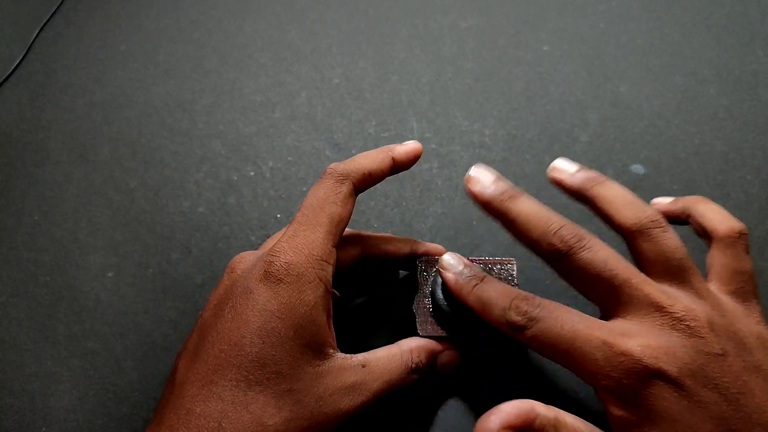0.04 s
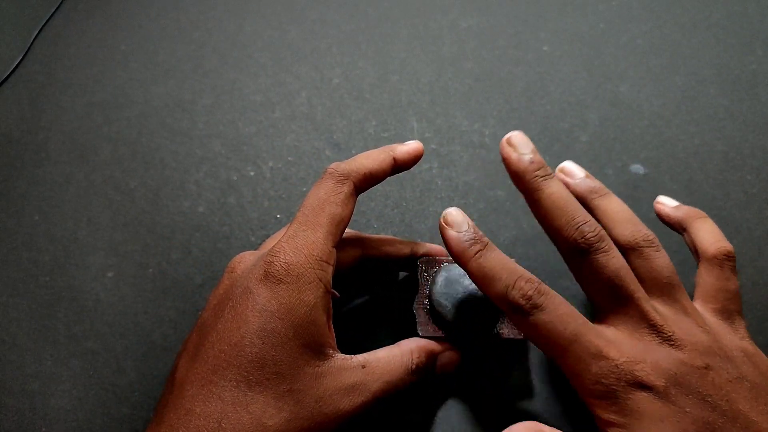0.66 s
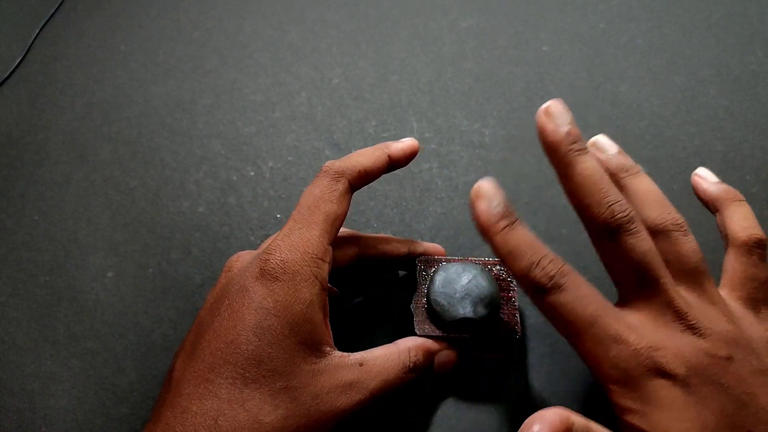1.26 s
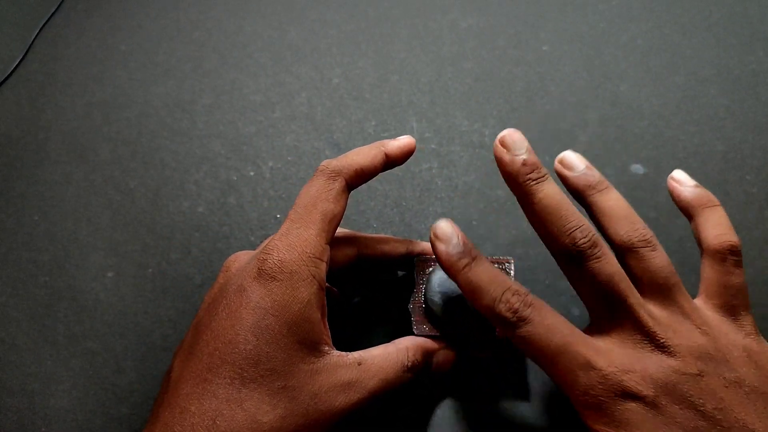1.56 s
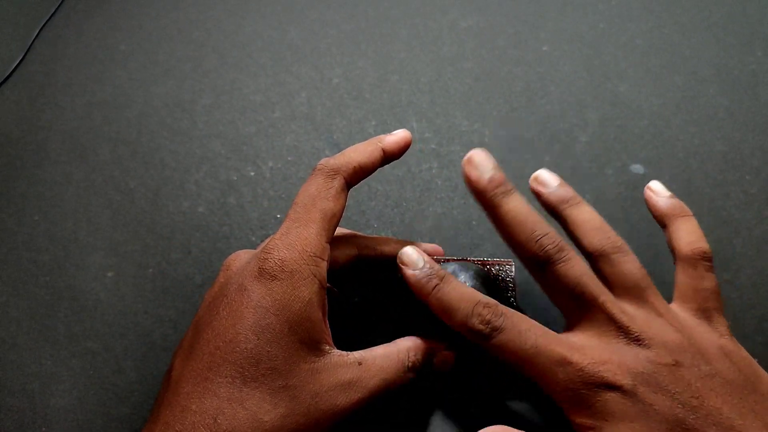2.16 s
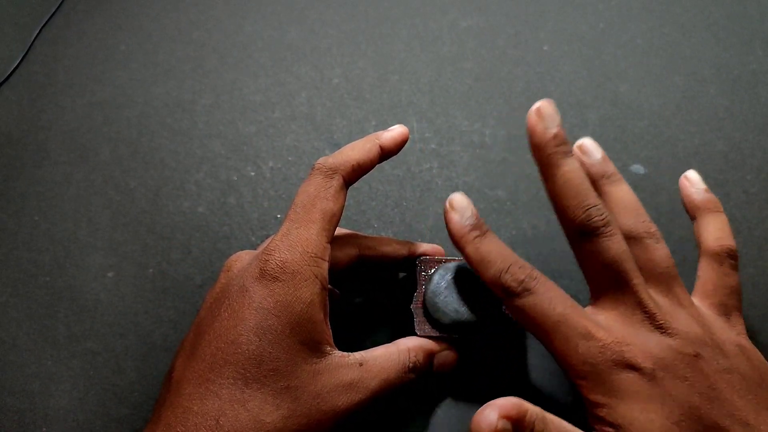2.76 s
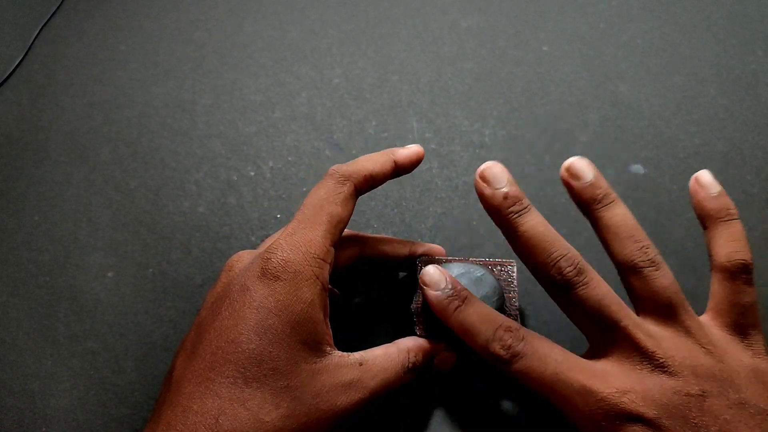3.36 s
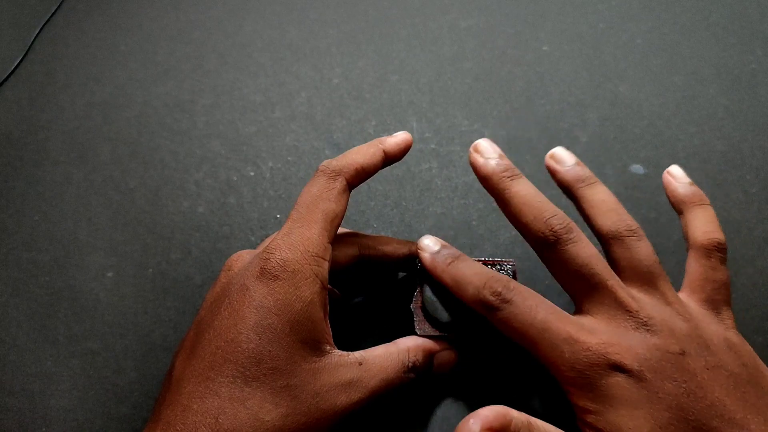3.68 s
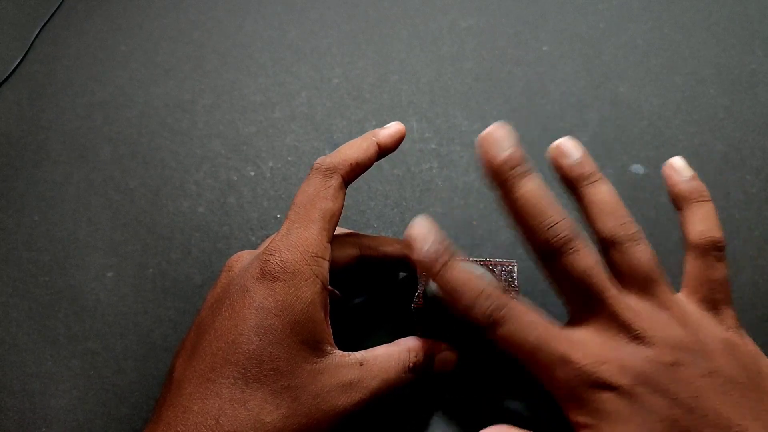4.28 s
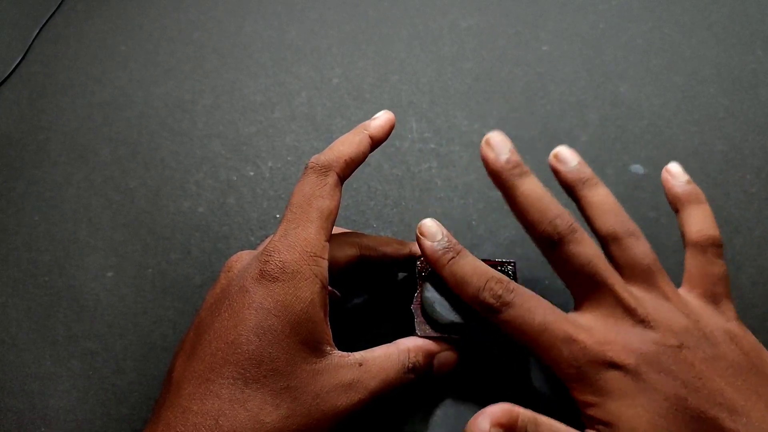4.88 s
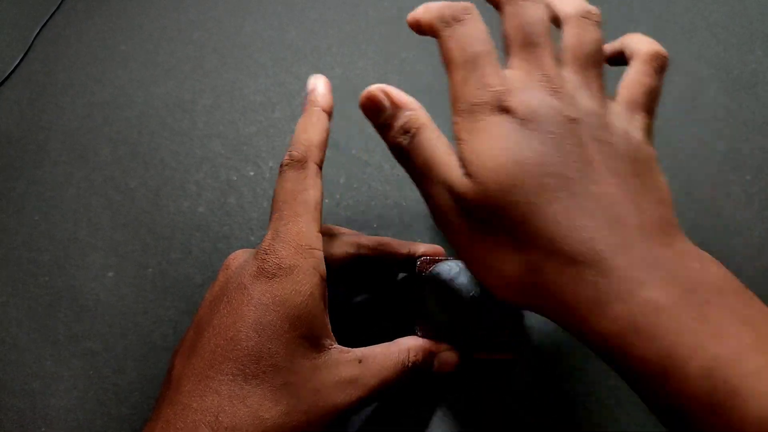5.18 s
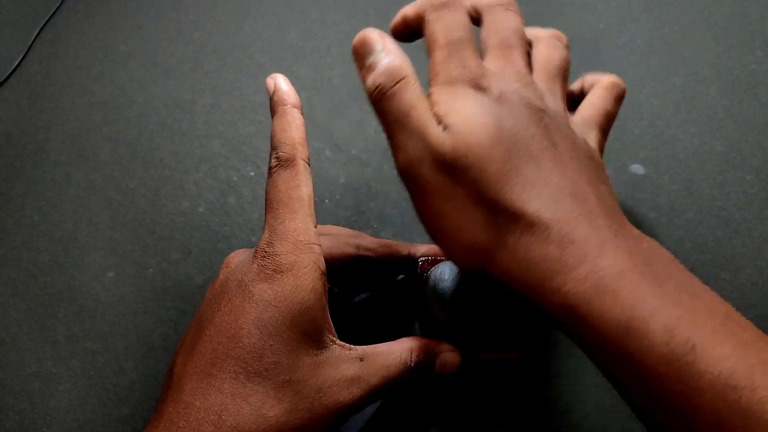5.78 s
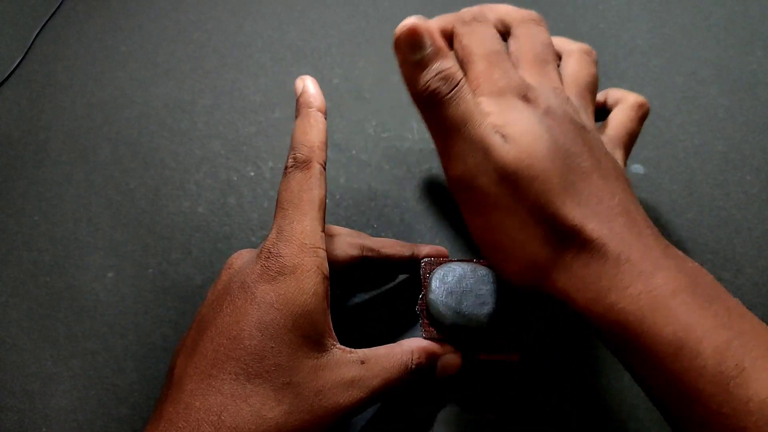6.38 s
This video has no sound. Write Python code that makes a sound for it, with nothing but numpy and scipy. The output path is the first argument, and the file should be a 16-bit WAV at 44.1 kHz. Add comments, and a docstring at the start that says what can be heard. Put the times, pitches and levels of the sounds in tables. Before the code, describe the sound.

Close up in a small, quiet room, quick fingertip taps land on putty, thudding softly through a table while the plastic base underneath clicks and chatters. The taps start light, vary in strength and are hardest just before they end. The hand then leans on the putty, and a few light knocks and tiny tacky clicks sound over a brief low rumble and a faint hiss of sliding skin.

```python
"""A finger taps a lump of putty on a small plastic base about six times a second, close to the microphone.
Each tap thumps the tabletop and rocks the base: the harder the tap, the later and more often it rebounds.
Light touches fall in between, and the tacky putty ticks as skin peels off it.
At the end the hand leans over and presses with the thumb, swaying the table and rubbing a little.
A small, quiet room rings briefly around it all."""
import sys
import numpy as np
from scipy import signal
from scipy.fft import rfft, irfft
from scipy.io import wavfile

SR = 44100
rng = np.random.default_rng(int(sys.argv[2]) if len(sys.argv) > 2 else 0)


def transcribe(u):
    """Save the signal u as a 16-bit wav file named by the first command-line argument.

    u: samples, shape (n,) or (channels, n), limited to [-1, 1]; the rate is SR.
    q: integer samples, one column per channel.
    """
    v = np.clip(np.atleast_2d(u).T, -1, 1)
    q = np.round(v * 32767).astype(np.int16)
    wavfile.write(sys.argv[1], SR, q)


N = 292515

# Taps on the putty. Each row: start in seconds, force in dB relative to full force, relative snap in dB.
TAPS = [(0.0748, -28, -76), (0.2534, -16, -63.5), (0.4336, -15, -66), (0.65, -10, -60),
        (0.8228, -13.5, -60.5), (0.9853, -19.5, -65), (1.1553, -18, -63.5), (1.4276, -12.5, -46),
        (1.5973, -3, -52), (1.7523, -9, -55), (1.909, -19, -67), (2.0712, -8, -61), (2.2399, -6.5, -59),
        (2.3974, -8.5, -62), (2.5563, -8.5, -61), (2.7241, -10.5, -59), (2.9014, -9.5, -55),
        (3.0701, -8, -49), (3.272, -3.5, -43.5), (3.4615, -3.5, -55), (3.6407, -12, -65),
        (3.7797, -14.5, -60), (3.9477, -9, -61), (4.2356, -1.7, -56.5), (4.4254, -0.7, -55.5),
        (4.6171, -0.3, -56), (4.7987, -2, -56), (4.9567, -4.5, -57)]
# The ring of the tabletop. Each row: pitch in Hz, relative level in dB, t60 in seconds.
TABLETOP_MODES = [(35, -15, .4), (45.2, -14.5, 0.16), (63.03, -3.7, 0.29), (106.5, -5, 0.19),
                  (143, -22, 0.14), (197.2, -8, 0.14), (261.3, 1.5, 0.052), (294, 1, 0.058),
                  (395, -11, 0.018), (480.4, -24, 0.074), (621, -24, .14), (705, -21.5, 0.11)]
# The tone of a dead kick on the tabletop. Each row: frequency in Hz, relative level in dB.
KICK_SPECTRUM = [(40, -12), (105, 5.5), (175, 4.5), (290, 4), (470, -9), (690, -9), (900, -18), (1400, -28),
                 (3000, -36), (8000, -72)]
# The tone of rubbing skin. Each row: frequency in Hz, relative level in dB.
SKIN_SPECTRUM = [(400, 11), (1100, -6.5), (3000, -1.5), (6000, -6.5), (11000, -7.5), (14400, -20)]


def from_db(db):
    """Decibels to gain."""
    return 10 ** (np.asarray(db) / 20)


def rms_one(x):
    """Scale to unit rms."""
    return x / np.sqrt(np.mean(x ** 2) + 1e-20)


def at_hz(points, hz):
    """Read a table on a log-frequency axis."""
    f, value = np.transpose(points)
    return np.interp(np.log(np.maximum(hz, 1)), np.log(f), value)


def clicks(times, db):
    """One impulse for each contact."""
    out = np.zeros(N)
    np.add.at(out, np.clip(np.round(times * SR).astype(int), 0, N - 1), from_db(db))
    return out


def soften(x, hz, order):
    """Low-pass: a soft contact passes little treble."""
    return signal.sosfilt(signal.butter(order, hz, fs=SR, output="sos"), x + 1e-18)


def colour(x, spectrum):
    """Causal (minimum-phase) filter with this spectrum and unit power gain."""
    size = 2 ** 14
    gain = rms_one(from_db(at_hz(spectrum, np.arange(size // 2 + 1) * SR / size)))
    cepstrum = irfft(np.log(gain))[:size // 2]
    cepstrum[1:] *= 2
    response = irfft(np.exp(rfft(cepstrum, size)))
    return signal.fftconvolve(x, response)[:N]


def bursts(hits, t60):
    """Each impulse sets off a puff of noise that dies away."""
    decay = from_db(-120 / (t60 * SR))
    power = signal.lfilter([1], [1, -decay], hits ** 2 + 1e-24)
    return np.sqrt(power) * rng.standard_normal(N)


def strike(modes, times, db, spread_db):
    """Every blow rings each mode with its own strength; neighbouring modes swing in opposite senses."""
    out = np.zeros(N)
    for k, (hz, level_db, t60) in enumerate(modes):
        r, w = from_db(-60 / (t60 * SR)), 2 * np.pi * hz / SR
        force = clicks(times, db + level_db + spread_db * rng.standard_normal(len(times)))
        out += (-1) ** k * signal.lfilter([0, np.sin(w)], [1, -2 * r * np.cos(w), r * r], force + 1e-18)
    return out


def stutter(times, db, span_s, spread_db, count):
    """Break each contact into a quick run of uneven little impacts that share its energy."""
    late = span_s * (np.arange(count) + rng.random((len(times), count))) / count
    share = from_db(spread_db * rng.standard_normal((len(times), count)) - 8 * late / span_s)
    share /= np.sqrt(np.sum(share ** 2, axis=1, keepdims=True))
    return (times[:, None] + late).ravel(), (db[:, None] + 20 * np.log10(share)).ravel()


def swells(rows, skew):
    """Gain of strokes that each rise and fall in a half sine; a skew below 1 makes them peak early."""
    t = np.arange(N) / SR
    return sum(from_db(db) * np.sin(np.pi * np.clip((t - start) / length, 0, 1) ** skew)
               for start, length, db in rows)


def room_tone():
    """A steady bed of quiet room rumble and microphone hiss."""
    # Each row: frequency in Hz, relative level in dB.
    bed_spectrum = [(12, -35.5), (20, 3), (130, -7), (437, -27), (778, -27), (1180, -32), (1310, -30),
                    (1640, -32), (3350, -35.5), (5650, -43), (14400, -43.5)]
    return from_db(-68) * rms_one(colour(rng.standard_normal(N), bed_spectrum))


def table_sway():
    """Shifting weight sways the table: a faint rumble under the tapping, swelling as the hand leans."""
    # Each row: frequency in Hz, relative level in dB.
    sway_spectrum = [(10, -13.5), (20, -4.5), (30, 2.5), (45, -12), (85, -20), (160, -46), (400, -79),
                     (2000, -110)]
    # The hand leans in. Each row: start in seconds, length in seconds, peak level in dB.
    leans = [(5.41, .28, -50.5), (5.74, .24, -40), (6.04, .24, -44), (6.33, .2, -51)]
    tapping = np.arange(N) / SR < 5.1
    rumble = rms_one(colour(rng.standard_normal(N), sway_spectrum))
    bed_gain = soften(from_db(np.where(tapping, -57, -69)), hz=20, order=1)
    return rumble * (bed_gain + swells(leans, skew=.55))


def thumps():
    """The putty cushions the finger, so only the lowest table modes answer its weight."""
    times, force_db, _ = np.transpose(TAPS)
    thump_db = -31.8 + .19 * force_db   # cushioned: it grows little with force
    return soften(strike(TABLETOP_MODES, times + .00034, thump_db, spread_db=.75), hz=134.8, order=3)


def knocks(touches):
    """The finger knocks on the table: full taps with its soft pad, light touches with its tip."""
    press_s = .0066   # the putty squashes this long before the push reaches the table
    tap_times, force_db, _ = np.transpose(TAPS)
    pad_db = -34 + .53 * force_db
    pad_ring = strike(TABLETOP_MODES, tap_times, pad_db, spread_db=2.2)
    pad_kick = colour(clicks(tap_times + press_s, pad_db + 19), KICK_SPECTRUM)
    pad = soften(pad_ring + pad_kick, hz=335, order=2)
    touch_times, tip_db, _ = touches.T
    tip_ring = strike(TABLETOP_MODES, touch_times + .0019, tip_db + 1, spread_db=3)
    tip_ring = soften(tip_ring, hz=385, order=2)
    tip_ring -= soften(tip_ring, hz=150, order=1)   # a shorter contact stirs less bass
    tip_kick = colour(clicks(touch_times + .00307, tip_db + 13), KICK_SPECTRUM)
    return pad + tip_ring + tip_kick


def snaps(touches):
    """Skin snaps against the putty: a short ring and a puff of hiss on every tap and touch."""
    # Fingertip, putty and base together. Each row: pitch in Hz, relative level in dB, t60 in seconds.
    snap_modes = [(404, -8.5, 0.025), (605, -11, 0.013), (685, -7, 0.029), (1021.5, 0, 0.016),
                  (1233, -2, 0.01), (1735, -13, 0.016)]
    times, _, snap_db = np.vstack([TAPS, touches]).T
    ring = strike(snap_modes, times + .0012, snap_db + 1, spread_db=2)
    skin = colour(bursts(clicks(times, snap_db - 15), t60=.051), SKIN_SPECTRUM)
    return ring + skin


def base_contacts():
    """The rocking base meets the table. Each row: time in seconds, chatter in dB, kick offset in dB."""
    # The base tips, drops an edge, falls flat and rebounds twice; a harder tap throws it higher.
    # Each row: delay at full force in seconds, added seconds per dB of force, chatter at full force in dB,
    # added dB per dB of force, least force needed in dB, kick offset from the chatter in dB.
    rocking = [(0.0071, -.00007, -50, .23, -26, -8), (0.0132, 0, -49.5, .75, -22, -12),
               (0.016, .0001, -44, .85, -22, 5), (0.0186, 0, -53, .15, -25, -14),
               (0.032, .00055, -44.5, .4, -13.5, 5.5), (0.0352, .00065, -50, .6, -12, -9),
               (0.0462, .0007, -48.5, .1, -8, 5), (0.0503, .0006, -51.5, .2, -7, -2)]
    # Lone ticks as the base settles. Each row: start in seconds, relative chatter in dB.
    settling_ticks = [(1.0246, -58), (3.339, -59), (3.679, -57)]
    light_kick_db, uneven_s, uneven_db = -16, .0004, 1.0
    rows = [(start, db, light_kick_db) for start, db in settling_ticks]
    for start, force_db, _ in TAPS:
        rows.append((start, -67 + .7 * force_db, light_kick_db))   # a graze as the finger lands
        for delay, delay_per_db, full_db, per_db, least_db, kick_db in rocking:
            late, louder = rng.standard_normal(2)
            spare_force = max(1 - from_db(least_db - force_db), 1e-4)   # only the excess lifts the base
            landing = start + delay + delay_per_db * force_db + uneven_s * late
            chatter_db = full_db + per_db * force_db + 10 * np.log10(spare_force) + uneven_db * louder
            rows.append((landing, chatter_db, kick_db))
    return np.array(rows)


def base_chatter():
    """Each contact of the base spits gritty clicks, rings the plastic and gives the table a dead kick."""
    # Each row: pitch in Hz, relative level in dB, t60 in seconds.
    plastic_modes = [(1450, -23, 0.0022), (2107, 2, 0.008), (2350, -1.3, 0.012), (2762, -8.5, 0.012),
                     (5275, -32, 0.052), (10400, -56, 0.003), (12100, -32, 0.012)]
    # Each row: frequency in Hz, relative level in dB.
    grit_spectrum = [(500, 20.5), (1000, 10.5), (2300, -7.5), (3600, 1.5), (5500, 5.5), (8000, 8.5),
                     (10200, 11.5), (14400, 11.5)]
    times, db, kick_db = base_contacts().T
    firm_db = .34 * (db + 53.5)   # firm contacts ring the plastic; grazing ones are mostly grit
    plastic = strike(plastic_modes, times + .00021, db + firm_db - .3, spread_db=2.8)
    grit_db = db - firm_db
    # An edge never lands flat, so each click is a tiny flam.
    flam_times, flam_db = stutter(times - .0003, grit_db, span_s=.0013, spread_db=4, count=2)
    sharp = clicks(flam_times, flam_db + 13.3) * rng.choice([-1, 1], N)
    hits = clicks(times, grit_db)
    fizz = from_db(-15) * bursts(hits, t60=.013) + from_db(-14) * bursts(hits, t60=.049)
    grit = colour(sharp + fizz, grit_spectrum)
    kick = colour(clicks(times + .0005, db + kick_db + 26.5), KICK_SPECTRUM)
    return plastic + grit - kick


def room_tail(x):
    """Diffuse tail of a small room, dying at its own pace in each octave."""
    # Each row: frequency in Hz, relative level in dB.
    tail_spectrum = [(150, -2), (300, 0), (480, -2.5), (680, 3.5), (1050, -1), (1600, -13), (2500, -0.5),
                     (5000, -8.5), (14000, -24)]
    # Each row: frequency in Hz, t60 in seconds.
    decay_times = [(150, 0.45), (700, 0.35), (2500, 0.26), (14000, 0.46)]
    t = np.arange(int(.6 * SR)) / SR
    tail = np.zeros(len(t))
    for low_hz in 110 * 2. ** np.arange(7):
        octave = signal.butter(2, [low_hz, 2 * low_hz], "band", fs=SR, output="sos")
        band = signal.sosfilt(octave, rng.standard_normal(len(t)))
        hz = low_hz * np.sqrt(2)
        tail += band * from_db(at_hz(tail_spectrum, hz) - 60 * t / at_hz(decay_times, hz))
    tail *= 1 - np.exp(-t / .002)
    return signal.fftconvolve(x, tail / np.sqrt(np.sum(tail ** 2)))[:N]


def putty_peel():
    """Skin peeling off the tacky putty makes a few tiny bright clicks."""
    # The putty lets go. Each row: start in seconds, relative level in dB.
    releases = [(0.147, -73), (1.3438, -61.5), (1.373, -71.5), (5.883, -66), (6.171, -66), (6.383, -75),
                (6.41, -74)]
    # Each row: frequency in Hz, relative level in dB.
    peel_spectrum = [(500, -6), (1800, 12), (3200, -16), (4400, 4), (6300, 2.5), (8000, 4), (11000, -3),
                     (14400, 5)]
    times, db = stutter(*np.transpose(releases), span_s=.0025, spread_db=2.5, count=5)
    return colour(clicks(times, db + 21.5) * rng.choice([-1, 1], N), peel_spectrum)


def light_touches():
    """Touches that leave the base at rest, plus the faint bump of the finger lifting after each tap."""
    # Each row: start in seconds, relative knock in dB, relative snap in dB.
    touches = [(0.333, -54, -85), (1.691, -42.5, -51.5), (1.978, -56, -73), (2.146, -54, -76),
               (2.322, -48.5, -65), (2.654, -52, -82), (2.834, -50, -76), (3.162, -41, -53),
               (3.874, -50, -64), (4.029, -49, -74), (4.693, -52, -64), (5.06, -44.5, -58.5),
               (5.582, -42, -47.5), (5.884, -40.5, -46.5), (6.17, -52, -64), (6.41, -62, -75)]
    lift_s, scatter_s = .08, .006
    lifts = [(start + lift_s + scatter_s * rng.standard_normal(), -64, -80) for start, _, _ in TAPS]
    return np.array(touches + lifts)


def skin_rub():
    """Sliding skin hisses in fine grains."""
    # Each row: start in seconds, length in seconds, relative peak level in dB.
    slides = [(.29, .17, -75.5), (1.65, .5, -80), (2.1, .6, -81.5), (2.62, .72, -78.5), (3.45, .5, -82.5),
              (4.75, .55, -85), (5.36, .4, -78), (5.68, .24, -77.5), (6.07, .14, -76), (6.36, .08, -80)]
    grain_db = 3 * rms_one(soften(rng.standard_normal(N), hz=126, order=2))
    hiss = colour(rng.standard_normal(N) * from_db(grain_db), SKIN_SPECTRUM)
    return hiss * swells(slides, skew=.9)


def scene():
    """Table, base and hand over a quiet room, in mono."""
    touches = light_touches()
    knock = knocks(touches)
    snap = snaps(touches)
    rattle = base_chatter() + putty_peel()
    # Knocks reach the microphone through the table, snaps through the air, so snaps carry more room.
    tail = room_tail(from_db(-21.5) * knock + from_db(-25) * rattle + from_db(-3.5) * snap)
    return (room_tone() + thumps() + knock + snap + rattle + table_sway() + skin_rub() + tail)[None]


def record(dry):
    """A steep low-pass takes off the very top."""
    cutoff_hz = 14450
    return signal.sosfilt(signal.ellip(12, .1, 70, cutoff_hz, fs=SR, output="sos"), dry)


dry = scene()
out = record(dry)
transcribe(out)
```